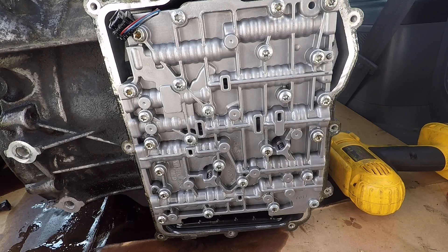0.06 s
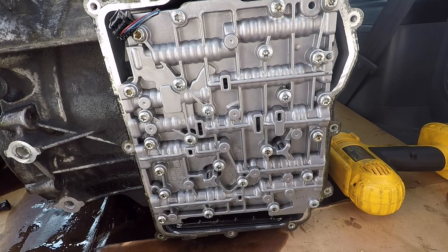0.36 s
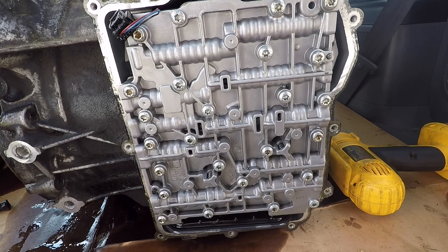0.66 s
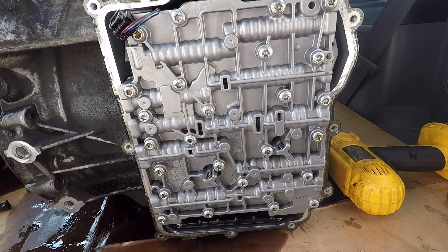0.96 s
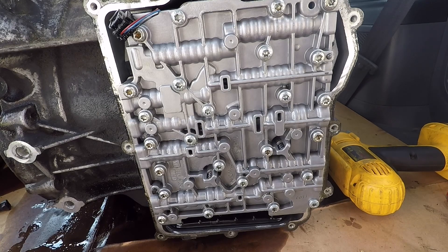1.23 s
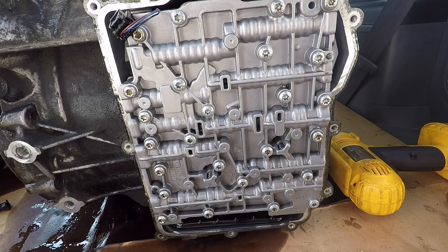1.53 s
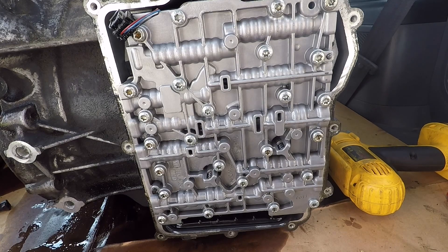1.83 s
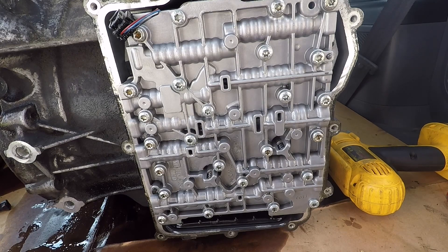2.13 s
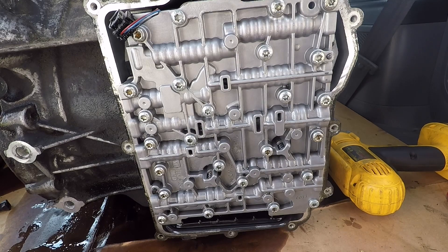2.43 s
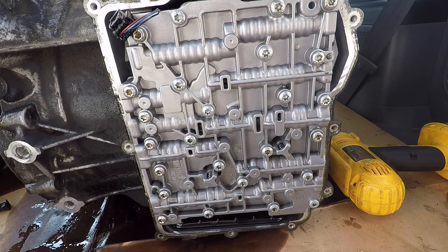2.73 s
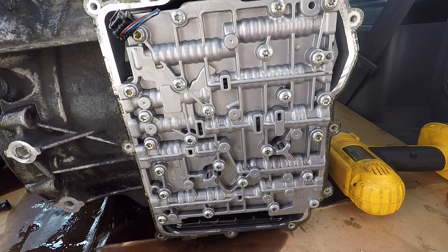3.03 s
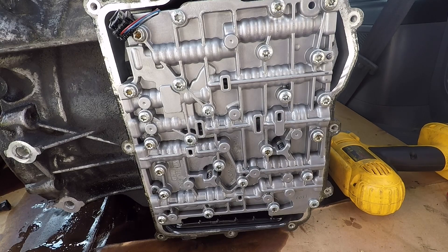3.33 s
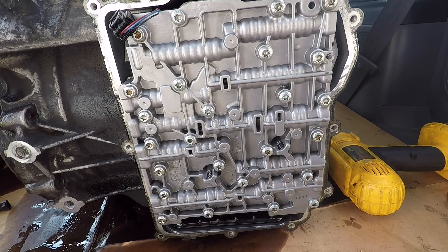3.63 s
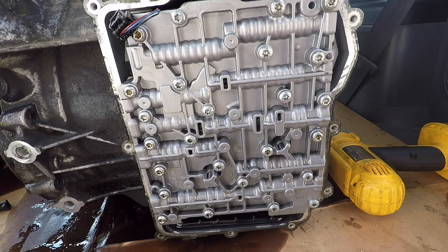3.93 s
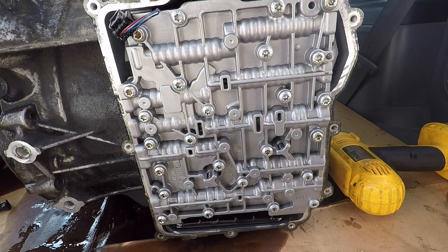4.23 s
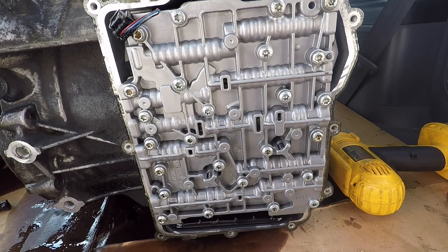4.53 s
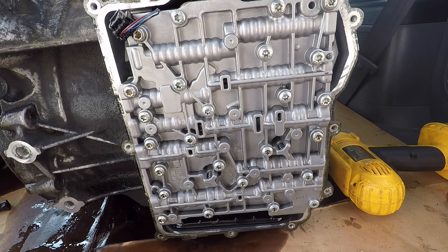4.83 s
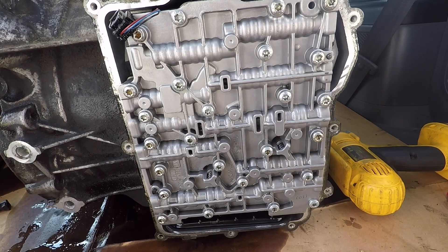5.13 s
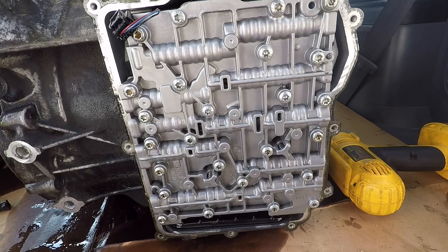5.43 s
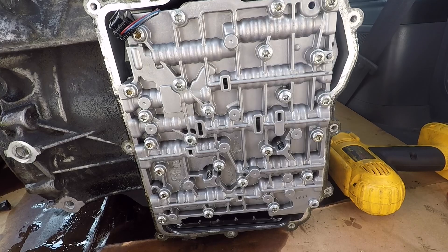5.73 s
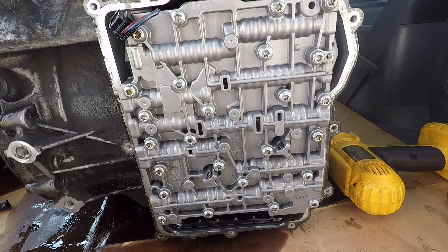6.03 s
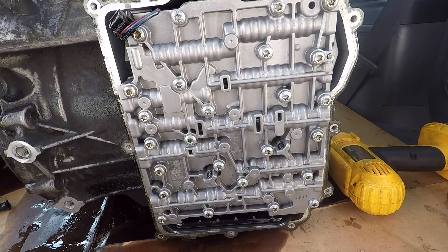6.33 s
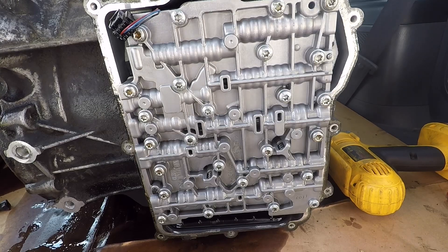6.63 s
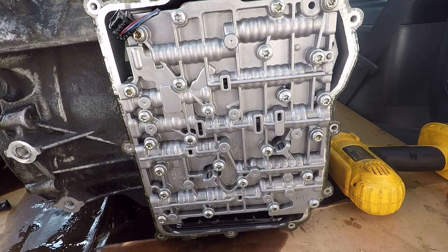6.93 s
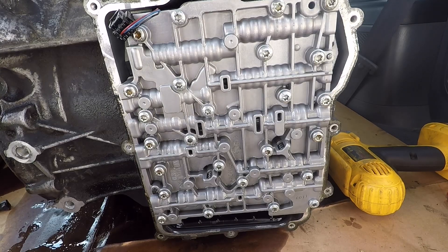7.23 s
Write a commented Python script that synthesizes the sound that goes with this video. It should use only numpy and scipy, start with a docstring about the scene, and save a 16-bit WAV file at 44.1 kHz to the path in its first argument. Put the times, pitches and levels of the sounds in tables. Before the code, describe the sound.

A cricket trills outdoors in a high, rapid pulse, pausing briefly twice early on. Close to the microphone, tools are handled with hollow knocks, metallic ticks, gritty rubs and light brushes of cloth. The handling eases, then returns in a busier burst. Near the end, wind rumbles briefly on the microphone and a distant engine swells over soft air and faint insects.

```python
"""A cricket trills outdoors, about 18 short arched syllables a second, each one a stroke of its wings.
Tools are handled close by: knocks, ticks and gritty rubs ring a small hollow housing around the
microphone, and cloth brushes past. Behind them lie steady air and a faint insect chorus. Late on,
wind rumbles briefly on the microphone, two far insects join in and a distant engine drone swells."""
import sys
import numpy as np
from scipy import signal
from scipy.fft import rfft, irfft, next_fast_len
from scipy.io import wavfile
from scipy.ndimage import uniform_filter1d

SR = 44100
rng = np.random.default_rng(int(sys.argv[2]) if len(sys.argv) > 2 else 0)


def master(y):
    """Save y as 16-bit WAV."""
    cut = np.clip(np.atleast_2d(y).T, -1, 1)
    pcm = np.round(cut * 32767)  # scale
    wavfile.write(sys.argv[1], SR, pcm.astype(np.int16))


N = 329427

# Tool blows. Each row: time in seconds, thump, clack and tick levels in dB, then their pitches in Hz.
BLOWS = [(0.159, -32, -31.5, -45, 200, 654, 3900), (0.185, -40, -33.5, -39, 340, 635, 3300),
         (0.249, -23, -27.5, -37.5, 227, 620, 2970), (0.417, -30.5, -36, -51, 206, 640, 2860),
         (0.655, -38, -19.5, -37, 168, 560, 3150), (0.663, -14.5, -46, -49, 186, 640, 3180),
         (0.689, -22, -28, -37.5, 205, 650, 5970), (0.788, -11, -33, -41.5, 193, 655, 2800),
         (1.027, -29, -31, -34, 294, 455, 5900), (1.058, -28, -31, -35, 257, 463, 6100),
         (1.082, -17, -44, -50, 246, 480, 6500), (1.118, -21.5, -42, -37, 355, 1300, 7500),
         (1.13, -23.5, -45, -41, 235, 1410, 5500), (1.627, -15.5, -39.5, -59, 210, 710, 6000),
         (1.899, -26, -44, -66, 195, 870, 6000), (2.013, -17.5, -36.5, -40, 147, 1000, 5950),
         (2.981, -31.5, -34.5, -44, 344, 630, 4700), (3.453, -36, -46.5, -44, 365, 1730, 4300),
         (3.568, -30, -32.5, -48, 159, 474, 5000), (3.678, -48, -24, -70, 202, 490, 6000),
         (3.751, -10.5, -27, -37, 205, 675, 4760), (3.777, -16, -26, -41, 232, 490, 3280),
         (3.815, -20, -16.5, -52, 210, 480, 3300), (3.829, -23, -42, -43, 206, 644, 5960),
         (3.86, -46, -41, -45, 213, 1020, 8100), (3.985, -36, -35.5, -46, 343, 1670, 7000),
         (4.011, -24, -27, -48, 320, 706, 6040), (4.021, -19.5, -24.5, -44, 167, 1600, 6000),
         (4.049, -20, -29.5, -33, 171, 1330, 7400), (4.079, -25, -31, -33, 180, 1490, 7750),
         (4.113, -31, -25, -31.5, 333, 1040, 7150), (4.129, -35, -36, -32, 252, 740, 5970),
         (4.18, -34, -39, -59, 201, 644, 6100), (4.267, -34, -23, -52, 163, 526, 4000),
         (4.344, -29, -32.5, -41, 338, 1470, 5650), (4.41, -31, -47, -30.5, 290, 656, 8300),
         (4.423, -21.5, -36.5, -34, 305, 483, 5300), (4.64, -33.5, -37.5, -49, 199, 480, 9300),
         (4.731, -31.5, -35.5, -59, 382, 456, 6000), (4.978, -23.5, -34.5, -43.5, 220, 444, 6500),
         (5.028, -44, -23.5, -44, 245, 570, 6500), (5.036, -20, -38, -32, 251, 480, 7740),
         (5.068, -34, -21, -48, 209, 524, 6500), (5.082, -13, -31, -37, 228, 506, 6700),
         (5.12, -17.5, -31, -29.5, 184, 640, 7540), (5.148, -22, -32, -33.5, 224, 666, 7300),
         (5.187, -30, -30.5, -33.5, 224, 1300, 7400), (5.266, -18, -24.5, -43, 192, 1250, 6500),
         (5.277, -20, -24.5, -36.5, 201, 670, 5800), (5.315, -26, -33.5, -60, 201, 1290, 6000),
         (5.426, -30.5, -32, -38.5, 344, 640, 5700), (5.496, -30.5, -35, -50, 340, 666, 4970),
         (6.546, -38, -35, -45, 266, 1810, 3950)]
# The housing at the two microphone ports. Each row: frequency in Hz, left minus right in dB.
PORT_BALANCE = [(150, -4.5), (350, -1.5), (490, -8.5), (660, -12.5), (1000, -7), (2500, -5), (6500, -7.5),
                (10000, -9.5), (13000, -4)]
# Each row: frequency in Hz, phase lead of the left port in radians.
PORT_PHASE = [(200, 0), (500, 1.36), (750, 3), (1400, 2), (3500, 2), (5500, 0.5), (8000, 4.5), (12000, -1)]


def cricket(gain_db=2.5, echo_s=0.026, cold_db=-3, cold_flat=.028):
    """Each wing stroke sweeps a nearly pure tone, softer and flat when cold; wall and yard echo it."""
    # The tooth rate rises, then sags. Each row: seconds from mid-stroke, pitch in Hz, level in dB.
    stroke = [(-.0115, 7080, -14), (-.009, 7380, -3), (-.006, 7540, -1), (-.002, 7590, 0),
              (.002, 7500, 1.5), (.005, 7310, .5), (.009, 7000, -5), (.013, 6600, -20)]
    s, hz, db = np.transpose(stroke)
    t = np.arange(s[0], s[-1], 1 / SR)
    song = np.zeros(N)
    for when, level_db, cold in wing_strokes():
        tuning, phase, force = rng.standard_normal(3)
        speed = 1 + .004 * tuning - cold_flat * cold
        turns = np.cumsum(np.interp(t, s, hz) * speed) / SR
        stroke_db = gain_db + level_db + cold_db * cold + 0.3 * force + np.interp(t, s, db)
        add(song, when + s[0], amp(stroke_db) * np.sin(2 * np.pi * (turns + phase)))
    song *= amp(wander(rate_hz=1100))  # uneven teeth on the wing's file
    echo = np.interp(np.arange(N) - echo_s * SR, np.arange(N), song)
    direct = np.array([song * amp(-0.5), np.roll(song, 1) * amp(-2.5)])
    yard = amp(-13) * convolve(song, scatter(t60=.1))
    return direct + echo * amp([[-23], [-21]]) + yard


def wing_strokes(warm_up_s=.17):
    """Time, level and coldness of each stroke: after a pause the cricket warms up to full effort."""
    # Unbroken trills. Each row: start and end in seconds, level in dB, coldness (0 or less is warm).
    trills = [(0.044, .52, -44, -0.5), (0.773, 1.86, -43.5, 0.8), (2.173, 7.4, -43.5, 0.9)]
    # Each row: time in seconds, wing strokes per second.
    pace = [(0, 17.36), (1, 18.25), (1.45, 17.46), (2.1, 17.9), (3.1, 17.48), (4.05, 18.02), (4.35, 16.7),
            (4.7, 17.83), (6.9, 17.88), (7.4, 17.05)]
    t = np.arange(N) / SR
    beats = np.cumsum(follow(pace)) / SR
    for start, end, level_db, cold in trills:
        first, last = np.interp([start, end], t, beats)
        for when in np.interp(np.arange(first, last), beats, t):
            yield when, level_db, np.clip(cold, 0, 1) * np.exp((start - when) / warm_up_s)


def handling():
    """Knocks and rubs ring the housing; nearby surfaces add a short tail."""
    soft, firm, sharp = housing()
    rumble_db, scrape_db, hiss_db = rub_levels()
    _, thump_db, clack_db, tick_db, thump_hz, clack_hz, tick_hz = np.transpose(BLOWS)
    thumps = knocks(soft, thump_db, thump_hz, gain_db=-6.0,
                    focus=13, q=3.5, chatter=.25, chatter_t60=.11, scuff_s=0, apart=.5)
    clacks = knocks(firm, clack_db, clack_hz, gain_db=-2.0,
                    focus=3.5, q=5, chatter=1.1, chatter_t60=.045, scuff_s=.002, apart=.6)
    ticks = knocks(sharp, tick_db, tick_hz, gain_db=-2.5,
                   focus=2, q=4, chatter=1.4, chatter_t60=.022, scuff_s=.001, apart=1)
    scrape = rubbing(firm, scrape_db, slips_per_s=300, smooth=.55, uneven_db=1.2, apart=.7)
    walls = wall_ring()
    rumble = rubbing(soft, rumble_db, slips_per_s=450, smooth=.29, uneven_db=2.5, apart=.47)
    hiss = rubbing(sharp, hiss_db, slips_per_s=450, smooth=.55, uneven_db=1.2, apart=1)
    direct = thumps + clacks + ticks + walls + scrape + rumble + hiss
    return direct + amp(-18) * convolve(direct.mean(0), scatter(t60=0.4, size=16384))


def housing(low_hz=370, high_hz=2200, size=8192):
    """The hollow housing's stereo responses to soft, firm and sharp contact: lows, mids and highs."""
    # Broad body tone. Each row: frequency in Hz, level in dB.
    body = [(30, -35.5), (110, -34), (142, -1.5), (200, -1), (320, -5), (560, -17.5), (850, -19),
            (1600, -25.5), (2200, -24.5), (3200, -27.5), (4500, -30), (6700, -22.5), (9000, -28.5),
            (11300, -45.5), (13000, -49), (15000, -72)]
    # Each row: centre in Hz, width in Hz, lift above the body tone in dB.
    resonances = [(196.7, 64, 5.5), (486, 49, 9.5), (652, 85, 11), (1080, 120, 2), (1310, 180, 1),
                  (1720, 89, 5), (2964, 190, 5), (3380, 260, 4.5)]
    hz = np.fft.rfftfreq(size, 1 / SR)
    colour = amp(curve_at(body, hz) + bumps(resonances, hz))
    lows = 1 / (1 + (hz / low_hz) ** 6)
    below_highs = 1 / (1 + (hz / high_hz) ** 6)
    to_left = amp(curve_at(PORT_BALANCE, hz)) * np.exp(1j * curve_at(PORT_PHASE, hz))
    responses = []
    for band in (lows, (1 - lows) * below_highs, 1 - below_highs):
        log_gain = np.log(colour * band + 1e-5)
        # minimum phase keeps the attack at the front
        phase = -signal.hilbert(np.r_[log_gain, log_gain[-2:0:-1]]).imag[:len(hz)]
        right = np.exp(log_gain + 1j * phase)
        pair = np.roll(irfft([right * to_left, right]), 24, axis=1)[:, :size // 2]
        responses.append(pair / np.linalg.norm(pair.mean(0)))
    return responses


def knocks(response, levels_db, pitches_hz, gain_db, focus, q, chatter, chatter_t60, scuff_s, apart):
    """A blow is an impulse amid a chatter of small contacts; where it lands favours one ringing pitch."""
    out, t = np.zeros((2, N)), np.arange(4096) / SR
    window = SR / 50  # a blow's level counts its energy as spread over 20 ms
    settle = amp(-60 * t / chatter_t60) * (1 - np.exp(-t / (0.16 * chatter_t60)))
    grits = rng.standard_normal((len(BLOWS), 3, len(t)))
    for (when, *_), db, hz, grit in zip(BLOWS, levels_db, pitches_hz, grits):
        blow = two_paths(grit, apart) * settle
        blow *= chatter / np.linalg.norm(blow[0])
        blow[:, round(scuff_s * SR)] += 1  # the main hit lands scuff_s into the chatter
        blow += focus * signal.lfilter(*signal.iirpeak(hz, q, fs=SR), blow)
        ring = convolve(blow, response)
        ring *= amp(db + gain_db) * np.sqrt(window) / np.linalg.norm(ring.mean(0))
        for port, sound in zip(out, ring):
            add(port, when - scuff_s, sound)
    return out


def wall_ring(coupling_hz=3000, loss_db_per_octave=9, rise_s=0.0012, size=6000):
    """Metal snaps brightly on metal and rings the housing's walls, most for ticks near coupling_hz."""
    # Each row: pitch in Hz, level against the coupled tick in dB, time to fall 60 dB in seconds.
    modes = [(1260, -8, 0.088), (1430, 2, 0.088), (1787, 7, 0.078), (2750, 0, 0.095), (3330, 5, 0.07)]
    snap_db, snap_hz, snap_t60, knee_db = 2.5, 10000, .022, -44
    out, t = np.zeros((2, N)), np.arange(size) / SR
    bursts = rng.standard_normal((len(BLOWS), 2, size)) * amp(snap_db - 60 * t / snap_t60)
    snaps = signal.lfilter(*signal.butter(2, snap_hz, "highpass", fs=SR), bursts)
    for row, snap, chance in zip(BLOWS, snaps, rng.standard_normal((len(BLOWS), len(modes), 2))):
        when, _, _, tick_db, _, _, tick_hz = row
        strength_db = tick_db - loss_db_per_octave * abs(np.log2(tick_hz / coupling_hz))
        softening_db = min(strength_db - knee_db, 0)  # weak contacts barely snap
        for port, sound in zip(out, snap):
            add(port, when, amp(strength_db + softening_db) * sound)
        for (hz, db, t60), (force, grip) in zip(modes, chance):
            angle = 2 * np.pi * hz * (1 + .045 * grip) * t  # the grip retunes the walls
            decay = amp(strength_db + db + 2 * force - 60 * t / t60) * np.minimum(t / rise_s, 1)
            left = amp(curve_at(PORT_BALANCE, hz)) * np.sin(angle + curve_at(PORT_PHASE, hz))
            add(out[0], when, decay * left)
            add(out[1], when, decay * np.sin(angle))
    return out


def rubbing(response, level_db, slips_per_s, smooth, uneven_db, apart):
    """Stick-slip: sparse slips of unequal size over a fine hiss, under wavering pressure."""
    slips = (rng.random((3, N)) < slips_per_s / SR) * rng.standard_normal((3, N))
    grain = two_paths(unit_rms(slips) + smooth * rng.standard_normal((3, N)), apart)
    grain = travelling_contact(grain, patchy_db=2.4)
    pressure = amp(uneven_db * wander(rate_hz=9.7))
    return convolve(amp(level_db) * unit_rms(grain * pressure), response)


def rub_levels():
    """Rumble, scrape and hiss in dB: each rub swells and dies away above the shifting grip."""
    # Each row: start, length and swell time in seconds, then rumble, scrape and hiss levels in dB.
    rubs = [(0.031, 0.31, 0.17, -36, -46, -55), (0.393, 0.11, 0.015, -39.5, -43.5, -58.5),
            (0.584, 0.13, 0.0081, -35, -37.5, -46.5), (0.749, 0.072, 0.011, -32, -40.5, -55),
            (0.873, .11, 0.098, -37, -39, -57), (0.985, 0.14, 0.036, -34.5, -33.5, -41.5),
            (1.223, 0.055, 0.044, -28, -37, -53), (1.257, 0.15, 0.094, -35, -43.5, -45.5),
            (1.423, 0.2, 0.016, -44, -48.5, -58.5), (2.012, 0.039, 0.011, -28, -43.5, -66),
            (3.448, 0.31, 0.2, -30.5, -35.5, -47.5), (3.714, 0.1, 0.056, -30, -29.5, -42),
            (3.844, 0.057, 0.014, -29.5, -39.5, -49.5), (4.028, 0.1, 0.02, -24, -29, -38),
            (4.161, 0.053, 0.016, -35, -32.5, -48.5), (4.329, 0.05, 0.0077, -31.5, -36, -45),
            (4.398, 0.018, 0.029, -32.5, -30.5, -37.5), (4.458, 0.2, 0.088, -38, -45, -57),
            (4.74, 0.025, 0.012, -46, -44, -44.5), (5.002, 0.21, 0.059, -23, -31.5, -40.5),
            (5.224, 0.035, 0.061, -18.5, -27, -36.5), (5.29, 0.077, 0.011, -27.5, -35, -56.5)]
    # A hand keeps shifting its grip. Each row: time in seconds, rumble level in dB.
    grip = [(0, -58.5), (1.75, -66), (2.5, -48), (3.4, -47), (5.5, -55.5), (5.9, -71)]
    grip_offsets_db, releases_s = [[0], [-8.5], [-28]], (0.051, 0.033, 0.023)  # rumble, scrape, hiss
    power = amp(follow(grip) + np.array(grip_offsets_db)) ** 2
    for start, length, swell, *levels_db in rubs:
        since = np.arange(0, length + 10 * max(releases_s), 1 / SR)
        for band, db, release in zip(power, levels_db, releases_s):
            pressure = np.minimum(since / swell, 1) * np.exp(-np.maximum(since - length, 0) / release)
            add(band, start, (amp(db) * pressure) ** 2)
    return 10 * np.log10(power)


def travelling_contact(grain, patchy_db, size=512):
    """As the contact point travels, different pitches stand out for a few hundredths of a second."""
    spectra = signal.stft(grain, nperseg=size)[2]
    patches = uniform_filter1d(rng.standard_normal(spectra.shape[1:]), size=5, axis=0)  # across pitch
    patches = uniform_filter1d(patches, size=3, axis=1)  # across time
    return signal.istft(spectra * amp(patchy_db * unit_rms(patches)), nperseg=size)[1][:, :N]


def cloth():
    """Light strokes of a sleeve: a fine, bright hiss that swells and fades."""
    # Each row: midpoint in seconds, length in seconds, level in dB.
    brushes = [(.99, 0.13, -43), (1.34, 0.24, -41.5), (2.52, 0.15, -53), (3.275, 0.41, -48.5)]
    # Each row: frequency in Hz, relative level in dB.
    colour = [(3500, -15), (6800, 1.5), (9300, -5.5), (11300, -17), (14000, -26)]
    pressure = np.zeros(N)
    for middle, length, db in brushes:
        arch = np.sin(np.pi * np.arange(0, length, 1 / SR) / length)
        add(pressure, middle - length / 2, amp(db) * arch)
    return pressure * amp(2 * wander(rate_hz=40)) * diffuse(lambda hz: curve_at(colour, hz))


def far_cricket(sync_s=6.056, period_s=.0954, chirp_s=.032, top_hz=6390, end_hz=5960):
    """A second cricket repeats slower, falling chirps, barely there until late in the scene."""
    # Each row: time in seconds, level in dB.
    level = [(5.2, -68), (6.5, -60)]
    progress = np.clip((np.arange(N) / SR - sync_s) % period_s / chirp_s, 0, 1)
    turns = np.cumsum(top_hz + (end_hz - top_hz) * progress) / SR
    envelope = amp(follow(level) + 2 * wander(rate_hz=10)) * np.sin(np.pi * progress)
    return envelope * np.sin(2 * np.pi * turns)


def thin_insect(pitch_hz=5385):
    """A third insect holds one thin, fluttering note for a while."""
    # Each row: time in seconds, level in dB.
    level = [(5.1, -85), (5.6, -64), (6.35, -63), (6.7, -85)]
    turns = np.cumsum(pitch_hz + 20 * wander(rate_hz=17)) / SR
    return amp(follow(level) + 2 * wander(rate_hz=20)) * np.sin(2 * np.pi * turns)


def air(level_db=-45.5):
    """A steady bed of outdoor air, strongest in the low mids."""
    # Each row: frequency in Hz, relative level in dB.
    colour = [(25, -40), (105, -40), (145, 1.5), (190, 0), (280, -9), (480, -11), (800, -14), (1500, -21),
              (3600, -31), (6200, -25), (9500, -29), (11200, -37), (14800, -49), (16000, -70)]
    return amp(level_db) * diffuse(lambda hz: curve_at(colour, hz)) * amp(.5 * wander(rate_hz=42))


def insect_chorus():
    """Many far insects blur into shimmering bands of high noise."""
    # Each row: centre in Hz, width in Hz, prominence in dB.
    bands = [(4810, 650, 7.5), (5250, 300, 8.5), (7400, 660, 14), (8260, 200, 8.5), (8940, 150, 10)]
    # Each row: time in seconds, gain factor.
    swell = [(0, 1.06), (4.8, 1.46)]
    peaks = diffuse(lambda hz: 20 * np.log10(np.maximum(amp(bumps(bands, hz)) - 1, 1e-6)))
    return amp(-59.5) * follow(swell) * amp(wander(rate_hz=11)) * peaks


def wind():
    """A puff of air on the microphone makes a deep, unsteady rumble."""
    # Each row: time in seconds, level in dB.
    level = [(1.99, -67), (2.03, -54), (2.25, -71.5), (5.15, -68), (5.37, -35), (5.7, -45.5), (6.2, -47.5),
             (6.6, -54), (7.47, -60)]
    # Each row: frequency in Hz, relative level in dB.
    colour = [(10, -3), (30, 4.5), (70, 0), (110, -4), (250, -44), (800, -71)]
    return amp(follow(level) + wander(rate_hz=13)) * diffuse(lambda hz: curve_at(colour, hz))


def drone():
    """A far engine swells: a dull roar with a few clean harmonics that sag, then creep upward."""
    # Each row: time in seconds, level in dB.
    level = [(0, -61), (6.1, -56), (6.6, -49), (6.9, -46.5), (7.15, -38.5), (7.33, -42), (7.47, -33.5)]
    # The roar's tone. Each row: frequency in Hz, relative level in dB.
    colour = [(60, -47), (115, -24), (150, -7.5), (210, -3), (280, -18.5), (600, -7), (800, -13.5),
              (1000, -27), (1300, -22.5), (2000, -39.5), (5000, -60)]
    # A narrow hum in the roar. Each row: centre in Hz, width in Hz, lift in dB.
    hum = [(195.4, 6.7, 9.8)]
    # The engine note. Each row: time in seconds, pitch in Hz.
    pitch = [(6.3, 160), (6.8, 151), (7.05, 154), (7.2, 159), (7.33, 162), (7.42, 177)]
    # Each row: multiple of the engine note, level against the roar in dB.
    harmonics = [(1, -14), (3, -13), (4, -20), (5, -21)]
    roar = diffuse(lambda hz: curve_at(colour, hz) + bumps(hum, hz))
    waver = 1 + .002 * wander(rate_hz=8)
    turns = np.cumsum(follow(pitch) * waver) / SR
    note = sum(amp(db + 2 * wander(rate_hz=0.74)) * np.sin(2 * np.pi * k * turns) for k, db in harmonics)
    return amp(follow(level)) * (roar + note)


def diffuse(colour_db):
    """Outdoor noise of a given colour as the two ports hear it, at unit rms."""
    # Each row: frequency in Hz, left-right correlation from -1 to 1.
    likeness = [(60, 0.94), (130, 1), (290, 0.12), (640, -0.74), (1410, -0.71), (3100, 0.14), (6820, -0.11)]
    # Each row: frequency in Hz, left minus right in dB.
    balance = [(60, -1.5), (400, -6.5), (1300, 1), (3500, -1), (5500, -3), (7400, -4), (8800, -6),
               (12000, 0)]
    size = next_fast_len(N, real=True)
    hz = np.fft.rfftfreq(size, 1 / SR)
    shared, own = rfft(rng.standard_normal((2, size)))
    same = np.clip(curve_at(likeness, hz), -1, 1)
    side = amp(curve_at(balance, hz) / 2)
    pair = np.array([shared * side, (same * shared + np.sqrt(1 - same ** 2) * own) / side])
    return unit_rms(irfft(pair * amp(colour_db(hz)), size)[:, :N])


def two_paths(grains, apart):
    """Of three random drives both ports share the first; each also feels one of its own."""
    return (grains[0] + apart * grains[1:]) / np.hypot(1, apart)


def scatter(t60, size=8192):
    """Dense reflections of unit energy, different for each port."""
    tail = rng.standard_normal((2, size)) * amp(-60 * np.arange(size) / SR / t60)
    return tail / np.linalg.norm(tail, axis=1, keepdims=True)


def wander(rate_hz):
    """Smooth random drift at unit rms."""
    hz = np.fft.rfftfreq(N, 1 / SR)
    return unit_rms(irfft(rfft(rng.standard_normal(N)) * np.exp(-(hz / rate_hz) ** 2), N))


def curve_at(points, hz):
    """A spectrum joined by straight lines on a log-frequency axis."""
    f, value = np.transpose(points)
    return np.interp(np.log(hz + 1), np.log(f + 1), value)


def follow(rows):
    """A curve over time, at every sample."""
    return np.interp(np.arange(N) / SR, *np.transpose(rows))


def bumps(peaks, hz):
    """Resonance peaks in dB."""
    return sum(db / (1 + (2 * (hz - f) / width) ** 2) for f, width, db in peaks)


def amp(db):
    return 10 ** (np.asarray(db) / 20)


def unit_rms(x):
    return x / np.sqrt(np.mean(x ** 2) + 1e-20)


def add(mix, start_s, sound):
    part = mix[max(round(start_s * SR), 0):][:len(sound)]
    part += sound[:len(part)]


def convolve(x, response):
    return signal.oaconvolve(np.atleast_2d(x), response, axes=1)[:, :N]


def scene():
    """Close handling and the cricket over the outdoor bed."""
    foreground = handling() + cloth() + cricket()
    return foreground + far_cricket() + thin_insect() + air() + insect_chorus() + wind() + drone()


def record(dry):
    """A steep low-pass trims the very top of the treble."""
    lowpass = signal.firwin(255, cutoff=15600, window=("kaiser", 9), fs=SR)
    return signal.oaconvolve(dry, lowpass[None], "same")


dry = scene()
out = record(dry)
master(out)
```